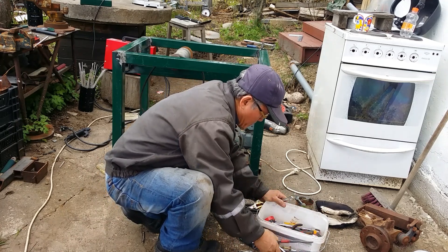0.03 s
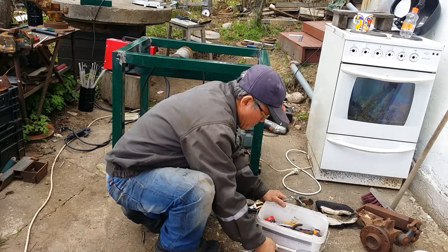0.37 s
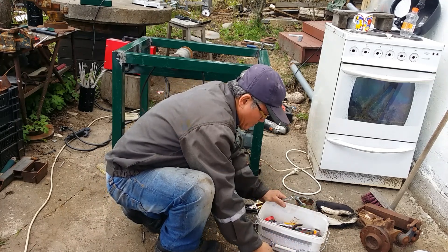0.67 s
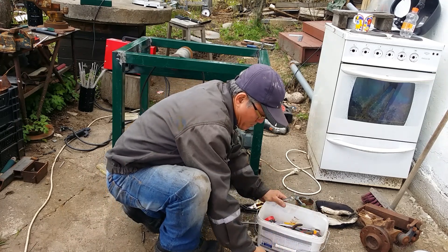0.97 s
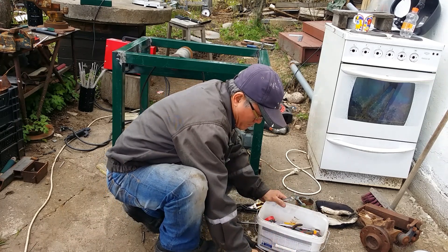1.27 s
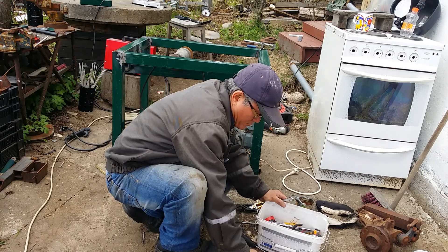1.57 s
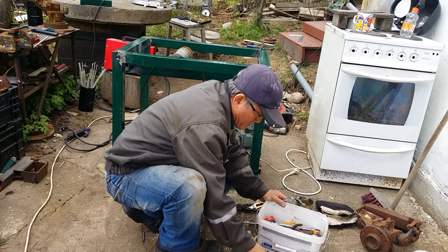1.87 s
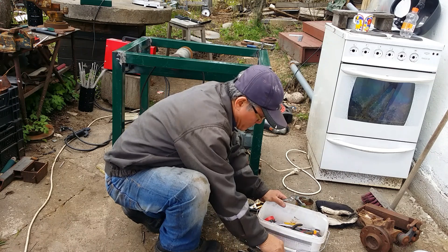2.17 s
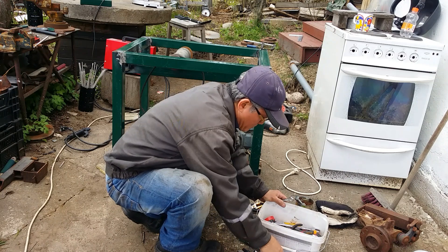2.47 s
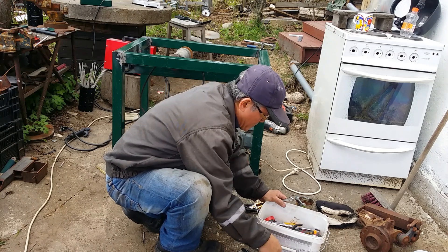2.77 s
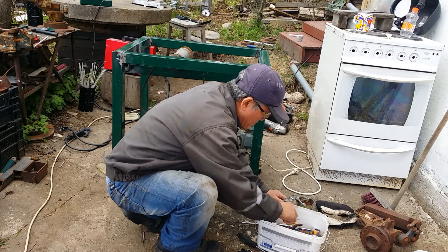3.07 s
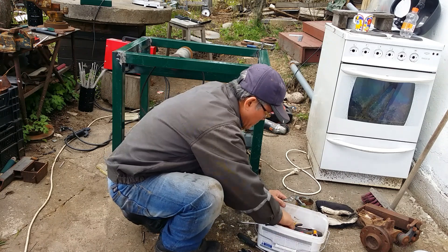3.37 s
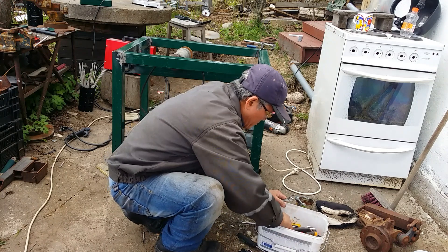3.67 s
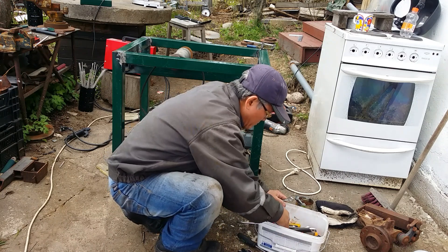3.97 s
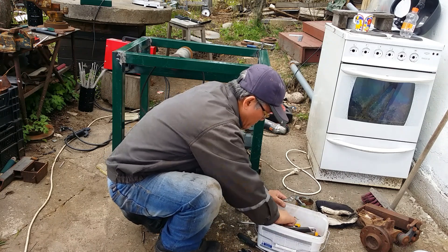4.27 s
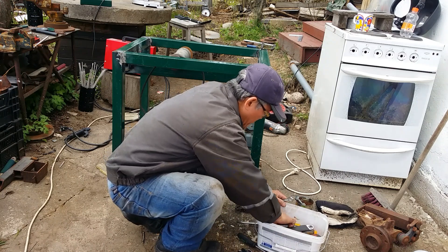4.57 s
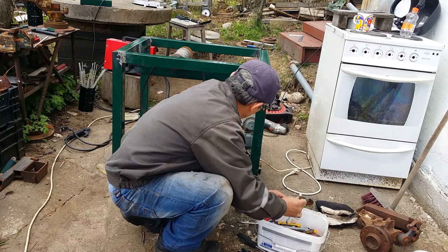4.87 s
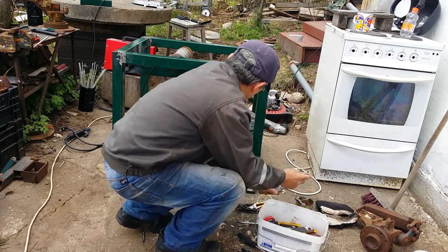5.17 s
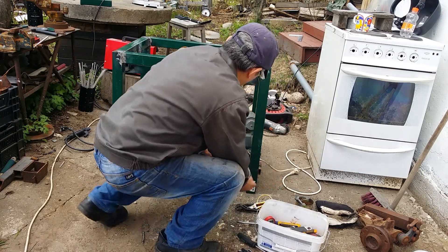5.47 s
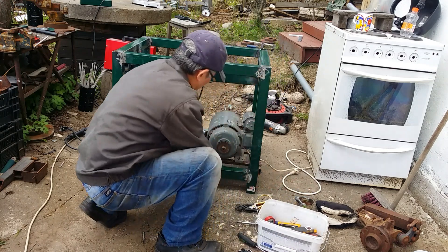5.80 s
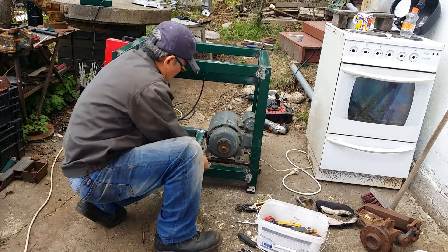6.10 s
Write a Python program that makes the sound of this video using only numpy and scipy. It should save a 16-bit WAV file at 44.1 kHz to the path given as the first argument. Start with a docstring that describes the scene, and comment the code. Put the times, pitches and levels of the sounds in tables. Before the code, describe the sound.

Steel hand tools clink, scrape and rattle in irregular bursts as someone rummages through a plastic box outdoors.

```python
"""Steel hand tools rattle, clink and slide in a plastic box as someone crouching in a yard rummages.
Each movement of the hand drags and jostles the heap: friction makes it scrape, impacts excite the
crowded, damped modes of box, handles and steel, and free tools ring on at their natural frequencies.
Then come a few dull steps on concrete and a distant clack of metal, heard mostly as echo.
Under it all lies quiet outdoor air with a faint motor hum and a thin whine."""
import sys
import numpy as np
from scipy import signal
from scipy.fft import rfft, irfft, next_fast_len
from scipy.io import wavfile
from scipy.ndimage import uniform_filter1d

SR = 44100
rng = np.random.default_rng(int(sys.argv[2]) if len(sys.argv) > 2 else 0)


def dump(signal):
    """Clip the signal to [-1, 1] and save it as 16-bit WAV at the path in sys.argv[1]."""
    limited = np.clip(np.atleast_2d(signal).T, -1, 1)
    pcm = np.round(limited * 32767).astype(np.int16)
    wavfile.write(sys.argv[1], SR, pcm)


N = 279587
TIME = np.arange(N) / SR

# The harder contacts in the heap: start_s, steel_db, box_re_steel_db, t60_s
HARD_CONTACTS = [(.307, -50.5, -15, 0.38), (0.359, -34.5, -19, 0.22), (.394, -36.5, -19.5, 0.19),
                 (.431, -28, -18, 0.094), (0.446, -36, -15, 0.58), (.541, -32, 6, 0.067),
                 (.612, -42, -17, 0.37), (.649, -28, -36, 0.072), (.749, -42.5, -15, 0.078),
                 (0.847, -50, -15, 0.11), (1.094, -41, -22, 0.091), (1.209, -48, -19, 0.05),
                 (1.277, -39, -16.5, 0.16), (1.499, -40.5, -21, 0.15), (1.709, -45, -6.5, 0.08),
                 (2.068, -37.5, -9, 0.17), (2.091, -31.5, -23, 0.65), (2.119, -20.5, -11, 0.031),
                 (2.131, -21.5, -13.5, 0.12), (2.143, -23, -9.5, 0.11), (2.185, -25, -38.5, 0.2),
                 (2.23, -35, -8, 0.089), (2.245, -32, -36, .13), (2.271, -32.5, -25.5, 0.074),
                 (2.553, -50.5, -10.5, 0.18), (2.667, -43.5, -11, 0.21), (3.017, -45.5, 11, 0.082),
                 (3.047, -26.5, -11.5, 0.19), (3.11, -38.5, -6, 0.23), (3.146, -50, -0.5, 0.65),
                 (3.372, -52, 15, 0.18), (3.391, -29.5, -11, 0.13), (3.501, -35, -17, 0.24),
                 (3.517, -32.5, -5.5, 0.21), (3.535, -33.5, -7.5, 0.44), (3.597, -35, -7, 0.58),
                 (3.628, -30, -4, 0.28), (3.651, -29, -6.5, 0.17), (3.693, -31.5, -26, 0.089),
                 (3.722, -30, -21.5, .1), (3.876, -51.5, 0, 0.11), (3.932, -50.5, 1.5, 0.083),
                 (4.31, -35.5, -4.5, 0.092), (4.576, -44.5, -3.5, 0.03), (4.623, -43, -2, 0.1),
                 (4.711, -30, -10.5, 0.31), (4.734, -23.5, -11, 0.11), (4.834, -44, 0, .25),
                 (4.862, -41, 5, .08), (4.875, -28.5, -45, 0.12), (5.01, -34, 1.5, 0.24),
                 (5.02, -39.5, 10, .11), (5.046, -39.5, -19, 0.18), (5.072, -28.5, 0.5, .1),
                 (5.199, -44.5, -2, 0.076), (5.232, -21, -24, 0.091), (5.248, -27, -7, 0.2),
                 (5.279, -26, 0.5, 0.095), (5.311, -23.5, -16.5, 0.15), (5.328, -24.5, -11.5, .11),
                 (5.489, -36, -11.5, 0.096), (5.619, -44.5, -17, 0.2), (5.753, -67.5, 22.5, 0.13),
                 (5.897, -34, -7.5, 0.13)]
# Resonant bands of the heap, from box up to steel:
# low_hz, high_hz, mode_spacing_hz, ear_correlation, pan_db, level_db, box_coupling (0 to 1)
HEAP_BANDS = [(319, 1020, 22, 0.53, 0, -0.5, 1), (1100, 3060, 35, 0.06, -1.6, -1.5, 0.77),
              (3107, 7460, 90, 0.023, 0.5, -1, 0.09), (6500, 10300, 550, 0.033, -10, -6, 0)]


def contacts(crack=3.1, rise_s=0.000305, rebound=0.32, max_gap_s=0.014, attack_s=0.0062, level_db=-1.5):
    """Impact excitation: a crack and three weaker bounces drive the modes of box, handles and steel."""
    out = np.zeros((2, N))
    for start_s, steel_db, box_db, t60 in HARD_CONTACTS + jostles():
        bounce_delays = np.cumsum(rng.uniform(0.11, 1, 3)) * max_gap_s
        for low, high, spacing_hz, correlation, pan_db, band_db, coupling in HEAP_BANDS:
            modes = crowded_modes(spacing_hz, correlation)
            blow = modes * struck(TIME[:modes.shape[1]], rise_s, t60)
            blow[:, 0] += crack
            rattle = blow.copy()
            for delay in bounce_delays:
                lag = int(delay * SR) + 1
                rattle[:, lag:] += rebound * fade(delay, t60) * blow[:, :-lag]
            rattle = signal.sosfilt(band(low, high), rattle)
            attack_rms = np.sqrt(np.mean(rattle[:, :int(attack_s * SR)] ** 2))
            gain = from_db(steel_db + band_db + coupling * box_db + level_db) / attack_rms
            add(out, start_s, gain * rattle * panned(pan_db))
    return out


# Natural modes of each tool, by name: pitch_hz, level_db, t60_s, pan_db
TOOL_MODES = { "long spanner": [(2950, -30, 1.2, 0), (4141, -25, .7, -6), (5092, -8, .7, -2),
              (6767, -14, .9, 1), (7657, 0, .5, -8), (10191, -10, .55, -9), (10957, -8, .5, -12),
              (12460, -23, .8, 0), (12580, -16, .85, -1), (14005, -5, .4, 10), (15441, -11, .29, 12)],
              "short spanner": [(2258, -26, .2, 6), (3714, -27, .15, 5), (3887, -8, .19, -1),
              (5641, -17, .15, 2), (5941, -7, .24, 3), (8136, -8, .14, -18), (8328, 0, .21, -16),
              (10442, -7, .16, -9), (11191, -12, .15, -2), (14544, -6, .08, 1)],
              "ring spanner": [(2391, -25, .12, 2), (3010, -9, .2, 5), (3558, -17, .55, 0),
              (5060, -22, .12, 2), (5211, -11, .3, 3), (6636, -19, .3, -8), (6826, -16, .25, -3),
              (7795, -22, .15, -8), (7935, 0, .22, -8), (10555, -16, .38, -1), (10692, -19, .2, 2),
              (11700, -28, .5, 0), (13730, -24, .3, -3), (14755, -26, .3, 2)],
              "socket": [(3610, -12, .15, -5), (4655, -13, .18, 4), (5482, -1, .25, 3), (5548, -7, .16, 7),
              (6846, -12, .15, -5), (7974, -4, .2, -12), (8241, 0, .2, -10), (8633, -7, .12, -12),
              (11065, -7, .2, -10), (11353, -11, .2, 2), (12075, -12, .25, 0), (13800, -11, .2, 0),
              (14948, -12, .22, -1)], "chisel": [(4338, -7, .12, 0), (4780, -1, .2, 3), (5671, 0, .15, -6),
              (6648, -7, .12, 0), (7472, -5, .15, -12), (8099, -3, .2, -12), (9964, -11, .2, 0),
              (11770, -10, .21, 0), (12650, -9, .28, 0), (13560, -8, .15, 0)],
              "pliers": [(2985, -1, .08, -2), (3605, 0, .09, 0), (5936, -10, .08, 6), (6664, -7, .1, 1),
              (6832, -1, .11, -8), (7944, -11, .18, -4), (9493, -11, .08, -8), (11800, -9, .11, 0)],
              "bolt": [(5460, -4.5, 0.26, -28), (8335, 3.5, 0.21, -19.5), (10500, -12, 0.19, -1),
              (14800, -17, .16, -1)], "hex key": [(5400, 6, 0.32, 8), (6730, -11, 0.069, -13),
              (7950, 6.5, 0.36, -24), (11000, -24, 0.16, -7), (11430, -23, 0.12, 10)],
              "screwdriver": [(2700, 3, 0.042, -1), (4400, -9, 0.052, 5), (6400, -1, 0.026, 8),
              (8300, -8, 0.049, -5)]}
# Blows that set a tool ringing: start_s, tool, level_db, ring_time_ratio, tilt_db_per_octave
TOOL_BLOWS = [ (.308, "bolt", -39, 0.62, 12), (0.364, "long spanner", -25, 0.11, -23),
              (0.394, "long spanner", -25.5, .16, -17), (0.432, "long spanner", -29, 0.78, 2),
              (0.444, "long spanner", -33, .35, -25), (.489, "bolt", -26, 0.56, 1),
              (.648, "chisel", -28, 0.13, -8), (0.652, "long spanner", -32.5, .22, -8),
              (.747, "screwdriver", -34.5, 0.94, -4), (.848, "screwdriver", -40, 0.3, -18),
              (1.047, "ring spanner", -49, 0.84, -23), (1.07, "long spanner", -50.5, 0.91, -14),
              (1.281, "bolt", -35, 0.49, 5), (1.5, "bolt", -33, 0.43, -4.5), (2.093, "bolt", -28, 0.4, 5),
              (2.119, "short spanner", -24, .39, -11), (2.122, "long spanner", -17.5, 0.23, -4),
              (2.133, "socket", -30.5, 1, 13), (2.161, "short spanner", -22, 0.77, -5.5),
              (2.162, "chisel", -24, 0.71, -2), (2.23, "chisel", -25.5, 0.23, 4.5),
              (2.667, "bolt", -45, 0.55, -8), (3.02, "long spanner", -46.5, 1.1, 2),
              (3.041, "short spanner", -19, 1.46, 3), (3.049, "long spanner", -17.5, 0.92, 3.5),
              (3.07, "short spanner", -18.5, 0.61, 9), (3.143, "long spanner", -25, 0.82, -6.5),
              (3.37, "hex key", -46.5, 1.04, 7), (3.512, "socket", -33, 1.9, 1.5),
              (3.596, "socket", -25, 0.91, -5), (3.652, "chisel", -29.5, 1.3, -1.5),
              (3.724, "socket", -29, 0.17, 0), (3.875, "socket", -44, 0.23, -2.5),
              (4.307, "pliers", -32.5, 0.73, -0.5), (4.319, "hex key", -51, 0.51, -3),
              (4.711, "socket", -29.5, 0.78, 7), (4.736, "socket", -22, 0.18, 0),
              (4.745, "hex key", -32, 0.4, 13), (4.864, "ring spanner", -38.5, 1.3, 19),
              (4.96, "ring spanner", -47.5, 2.3, -24), (5.072, "ring spanner", -29, 0.68, 12),
              (5.076, "ring spanner", -44, 0.54, -52.5), (5.234, "ring spanner", -20, 1.67, 8.5),
              (5.278, "ring spanner", -18, .75, 5), (5.32, "ring spanner", -36, .6, -36),
              (5.896, "hex key", -31, 0.69, 30)]


def clinks(rise_s=0.0013, bending_hz=5150, free_s=0.22, damping_t60=0.4, size=24000):
    """Free vibration: a struck tool rings in its natural modes, more briefly when it lies against others."""
    out = np.zeros((2, N))
    for start_s, tool, blow_db, ring_ratio, tilt_db in TOOL_BLOWS:
        strongest_hz = max(TOOL_MODES[tool], key=lambda mode: mode[1])[0]
        for hz, mode_db, t60, pan_db in TOOL_MODES[tool]:
            ring_t60 = t60 * ring_ratio
            t = TIME[:min(int(ring_t60 * SR * 1.3) + 2, size)]
            # each mode reaches the two ears out of step
            ear_phase = rng.uniform(-1.66, 1) * np.array([[1], [-1]])
            tone = np.sin(2 * np.pi * hz * (start_s + t) + ear_phase + rocking(t))
            # a soft blow (negative tilt) favours the main bending mode over those on either side
            octaves = abs(np.log2(hz / bending_hz)) - abs(np.log2(strongest_hz / bending_hz))
            gain = from_db(blow_db + mode_db + tilt_db * octaves)
            # the hand or the settling heap damps a ring that lasts
            damping = fade(np.maximum(t - free_s, 0), damping_t60)
            add(out, start_s, gain * panned(pan_db) * tone * struck(t, rise_s, ring_t60) * damping)
    return out


def rocking(t, step_rad=0.34, step_s=0.015, count=60):
    """Phase modulation: a ringing tool rocks on the heap, so its phase at each ear takes a random walk."""
    walks = step_rad * np.cumsum(rng.standard_normal((2, count)), axis=1)
    return np.array([np.interp(t, np.arange(count) * step_s, walk) for walk in walks])


# Movements of the hand, and at last of the whole body: start_s, end_s, stir_db, rumble_db
MOVEMENTS = [(0.359, .64, -54, -52.5), (1.045, 1.244, -63.5, -63.5), (2.074, 2.259, -53, -51.5),
             (2.439, 2.699, -60.5, -64.5), (3.1, 3.355, -59, -52.5), (3.367, 3.73, -47.5, -51.5),
             (3.748, 3.938, -66, -58), (4.516, 4.689, -57, -57), (4.709, 5.098, -49.5, -44.5),
             (5.217, 5.412, -49, -52.5), (5.454, 6.305, -60.5, -56.5)]
# Filter that shapes the scraping: frequency_hz, gain_db
SCRAPE_RESPONSE = [(150, 2), (400, -2.5), (800, 4.5), (1500, 1.5), (3000, -1.5), (6000, -6), (10000, -27.5),
                   (16000, -17.5)]


def sliding(slips_per_s=420, spread_db=-3.5, ring_t60=0.14):
    """Stick-slip friction: steel dragged over steel and plastic catches in many tiny, ringing slips."""
    slipping = rng.random(N) < slips_per_s / SR
    strengths = from_db(spread_db * np.minimum(rng.exponential(1, N), 3))
    slips = slipping * strengths * rng.choice([-1, 1], N)
    mode_set = rng.integers(0, 2, N)
    scrape = np.zeros((2, N))
    for k in range(2):
        modes = crowded_modes(spacing_hz=11, correlation=0.25)
        ring = modes * fade(TIME[:modes.shape[1]], ring_t60)
        scrape += signal.fftconvolve([slips * (mode_set == k)], ring, axes=1)[:, :N]
    stirring = effort([stir_db for _, _, stir_db, _ in MOVEMENTS], attack_s=0.1, release_t60=0.36)
    return stirring * coloured(scrape, SCRAPE_RESPONSE)


def jostles(count=4, above_stir_db=7.5, box_db=-4, spread_db=3, t60=0.14):
    """Random collisions: each movement sets off a few small contacts; rows as in HARD_CONTACTS."""
    rows = []
    for start_s, end_s, stir_db, _ in MOVEMENTS:
        times = start_s + (end_s - start_s) * (np.arange(count) + rng.random(count)) / count
        offsets_db = spread_db * rng.standard_normal((count, 2))
        for time_s, (steel_offset, box_offset) in zip(times, offsets_db):
            rows.append((time_s, stir_db + above_stir_db + steel_offset, box_db + box_offset, t60))
    return rows


# Dry snaps of small metal parts: start_s, level_db
METAL_SNAPS = [(2.1189, 0), (2.5497, -19.5), (2.6065, -22.5), (2.6366, -15.5), (2.6644, -13.5),
               (6.325, -21.5)]


def snaps(level_db=3.5, delay_s=0.0015, scatter=0.057, t60=0.084, size=6000):
    """Scattering: one sharp impulse is trailed by its diffuse return from the ground and the clutter."""
    out = np.zeros((2, N))
    for start_s, snap_db in METAL_SNAPS:
        snap = scatter * stereo_noise(0.1, size) * fade(TIME[:size], t60)
        snap[:, 0] += 1   # the direct impulse
        add(out, start_s + delay_s, from_db(snap_db + level_db) * signal.sosfilt(band(2280, 8000), snap))
    return out


# Dull bumps of box, handles and shoes: start_s, pitch_hz, level_db, t60_s
DULL_BUMPS = [(.542, 694, -18.5, 0.053), (0.542, 494, -31.5, 0.12), (.541, 2154, -14.5, 0.017),
              (2.066, 1290, -38, .04), (2.12, 2330, -23, 0.023), (2.143, 209, -32.5, 0.16),
              (2.781, 64.5, -44.5, .17), (3.017, 790, -22, 0.02), (3.018, 2440, -30.5, 0.028),
              (3.655, 438, -34, 0.2), (4.311, 1540, -29.5, 0.031), (4.624, 1900, -41, 0.046),
              (4.745, 811, -29, 0.15), (4.835, 120, -35.5, .15), (4.875, 391, -22, 0.055),
              (4.945, 134, -31, 0.087), (4.967, 84, -33, 0.09), (5.021, 400, -35, 0.044),
              (5.073, 127, -36.5, 0.064), (5.233, 1585, -12.5, 0.022), (5.237, 578, -21, 0.088),
              (5.502, 72.6, -37.5, 0.25), (5.61, 238, -23.5, 0.035), (6.206, 148, -26, 0.028)]


def thumps(rise_s=0.0019, roughness=0.33, pan_db=-7.0, size=12000):
    """Heavy damping: a soft impact gives one short tone, roughened by noise around its pitch."""
    out, t = np.zeros((2, N)), TIME[:size]
    for start_s, hz, level_db, t60 in DULL_BUMPS:
        noise = rms_one(signal.sosfilt(band(hz * 0.5, hz * 1.77), stereo_noise(0.12, size)))
        bump = np.sin(2 * np.pi * hz * t) + roughness * noise
        add(out, start_s, from_db(level_db) * bump * struck(t, rise_s, t60))
    return out * panned(pan_db)


def handling(level_db=0.5, low_hz=55, top_hz=900, pan_db=-2.5):
    """Forced vibration: box, sleeves and shoes shift with every movement and rumble softly."""
    shifting = signal.sosfilt(signal.butter(1, low_hz, "high", fs=SR, output="sos"), rumble(top_hz))
    swell = effort([rumble_db for *_, rumble_db in MOVEMENTS], attack_s=0.035, release_t60=0.78)
    return from_db(level_db) * swell * shifting * panned(pan_db)


# Echo of the distant clack: low_hz, high_hz, level_db, t60_s
CLACK_ECHO = [(1020, 1860, -41.5, 0.57), (2000, 3400, -38.5, 0.5), (3460, 6400, -33.5, 0.28),
              (5900, 8900, -36, 0.14), (9000, 13000, -48, .13)]
# Ringing modes of the distant metal: pitch_hz, level_db, t60_s
CLACK_RING = [(770, -3.5, 0.3), (1260, -6, 0.7), (1700, -10, 1), (2056, -10, 0.82), (2610, -6.5, 0.46),
              (2700, -14, 0.36)]


def distant_clack(start_s=5.979, rise_s=0.0043, ring_db=-41.5, size=36000):
    """Diffuse field: a far blow on metal arrives mostly as echo; treble dies first, a few tones ring on."""
    out, t = np.zeros((2, N)), TIME[:size]
    for low, high, echo_db, t60 in CLACK_ECHO:
        modes = crowded_modes(spacing_hz=13, correlation=0.037, size=size)
        echo = rms_one(signal.sosfilt(band(low, high), modes))
        add(out, start_s, from_db(echo_db) * echo * struck(t, rise_s, t60))
    for hz, mode_db, t60 in CLACK_RING:
        tone = np.sin(2 * np.pi * hz * t + rng.uniform(0, np.pi, (2, 1)))
        add(out, start_s, from_db(mode_db + ring_db) * tone * struck(t, rise_s, t60))
    return out


# Reverberation time of the yard: frequency_hz, t60_s
YARD_DECAY = [(100, 0.64), (600, 0.66), (1500, 1), (3000, 0.68), (8000, 1), (16000, 0.28)]


def yard(direct, wet_db=-26.5, rise_s=0.0054, size=40000):
    """Reverberation: walls and clutter return a thin tail in which each band decays at its own rate."""
    tail, t = np.zeros((2, size)), TIME[:size]
    edges_hz = np.geomspace(100, 16000, 9)
    for low, high in zip(edges_hz, edges_hz[1:]):
        t60 = at_hz(YARD_DECAY, np.sqrt(low * high))
        tail += signal.sosfilt(band(low, high), stereo_noise(0.1, size)) * fade(t, t60)
    response = rms_one(tail * (1 - np.exp(-t / rise_s))) / np.sqrt(size)
    return from_db(wet_db) * signal.fftconvolve(direct.mean(axis=0)[None], response, axes=1)[:, :N]


# Filter that shapes the outdoor air and the handling rumble: frequency_hz, gain_db
AIR_RESPONSE = [(15, -56), (25, -19), (49, 0.5), (84, -7), (117, -3), (190, -11.5), (439, -8), (624, -16),
                (1740, -28.5), (2110, -30.5), (2280, -30.5), (2690, -29.5), (2990, -34.5), (3820, -31),
                (16000, -40)]


def open_air(rumble_db=-60, hiss_db=-62, split_hz=900, pan_db=-1.5):
    """Ambient noise: a steady rumble, much alike at both ears, lies under a diffuse hiss."""
    air = coloured(stereo_noise(0.033, N), AIR_RESPONSE)
    hiss = signal.sosfilt(signal.butter(2, split_hz, "high", fs=SR, output="sos"), air)
    return from_db(rumble_db) * rumble(split_hz) * panned(pan_db) + from_db(hiss_db) * rms_one(hiss)


def rumble(top_hz, deep_hz=130):
    """Band-limited noise: deep bass and the band above it, largely coherent between the ears; rms 1."""
    deep = signal.sosfilt(signal.butter(2, deep_hz, fs=SR, output="sos"), stereo_noise(0.79, N))
    body = signal.sosfilt(band(deep_hz, top_hz), stereo_noise(0.8, N))
    return coloured(deep + body, AIR_RESPONSE)


# Tones of a far motor: pitch_hz, level_db
MOTOR_TONES = [(54, -73.5), (120, -74)]


def motor_hum():
    """Tonal noise: a far motor gives two low, nearly periodic tones."""
    return sum(from_db(db) * drifting_tone(hz, step_rad=0.0192) for hz, db in MOTOR_TONES)


def whine(pitch_hz=2620, level_db=-72, pause_from_s=1.67, pause_to_s=2.1):
    """Amplitude gating: a thin tone fades out once and returns."""
    running = (TIME < pause_from_s) | (TIME > pause_to_s)
    gate = uniform_filter1d(running.astype(float), size=6000)
    return from_db(level_db) * gate * drifting_tone(pitch_hz, step_rad=0.0328)


def drifting_tone(hz, step_rad):
    """Phase diffusion: a random step at every sample broadens a sine's spectral line."""
    return np.sin(2 * np.pi * hz * TIME + np.cumsum(rng.normal(0, step_rad, N)))


def effort(levels_db, attack_s, release_t60):
    """Amplitude envelope: each movement swells, holds its level and dies away once it ends."""
    gain = np.zeros(N)
    for (start_s, end_s, *_), db in zip(MOVEMENTS, levels_db):
        swell = np.clip((TIME - start_s) / attack_s, 0, 1)
        gain += from_db(db) * swell * fade(np.maximum(TIME - end_s, 0), release_t60)
    return gain


def crowded_modes(spacing_hz, correlation, size=8192):
    """Modal density: undamped modes at random pitches, spacing_hz apart on average; rms 1."""
    present = rng.random(size // 2 + 1) < SR / size / spacing_hz
    return rms_one(irfft(rfft(stereo_noise(correlation, size)) * present))


def stereo_noise(correlation, size):
    """Interaural correlation: white noise partly shared by the two ears."""
    mid, side = rng.standard_normal((2, size))
    return np.sqrt(1 + correlation) * mid + np.sqrt(1 - correlation) * side * np.array([[1], [-1]])


def coloured(x, response):
    """Spectral shaping: filter a steady sound by a table of gains; rms 1."""
    size = next_fast_len(N)
    gains = from_db(at_hz(response, np.arange(size // 2 + 1) * SR / size))
    return rms_one(irfft(rfft(x, size) * gains, size)[..., :N])


def at_hz(points, hz):
    """Interpolation of a table on a log-frequency axis."""
    frequencies, values = np.array(points).T
    return np.interp(np.log(hz + 1e-3), np.log(frequencies), values)


def band(low_hz, high_hz):
    """Band-pass filter sections."""
    return signal.butter(2, [low_hz, high_hz], "band", fs=SR, output="sos")


def struck(t, rise_s, t60):
    """Transient envelope: vibration builds up quickly, then decays."""
    return (1 - np.exp(-t / rise_s)) * fade(t, t60)


def fade(t, t60):
    """Exponential decay, 60 dB down after t60 seconds."""
    return from_db(-60 * t / t60)


def panned(db):
    """Constant-power panning: the left gain exceeds the right by db."""
    return rms_one(from_db(np.array([[db / 2], [-db / 2]])))


def from_db(db):
    """Decibels to amplitude ratio."""
    return 10 ** (np.asarray(db) / 20)


def rms_one(x):
    """Normalisation to rms 1."""
    return x / np.sqrt(np.mean(x ** 2) + 1e-20)


def add(out, start_s, sound):
    """Mix a sound in from start_s."""
    i = round(start_s * SR)
    out[:, i:i + sound.shape[-1]] += sound[..., :N - i]


def scene():
    """Superposition: the tools close by, their reverberation and the background of an open yard."""
    near = contacts() + clinks() + sliding() + snaps() + thumps()
    return near + handling() + distant_clack() + yard(near) + open_air() + motor_hum() + whine()


def record(dry):
    """Band limiting: a steep elliptic low-pass removes the highest treble."""
    cutoff_hz = 15900
    return signal.sosfilt(signal.ellip(10, 0.2, 80, cutoff_hz, fs=SR, output="sos"), dry)


dry = scene()
out = record(dry)
dump(out)
```